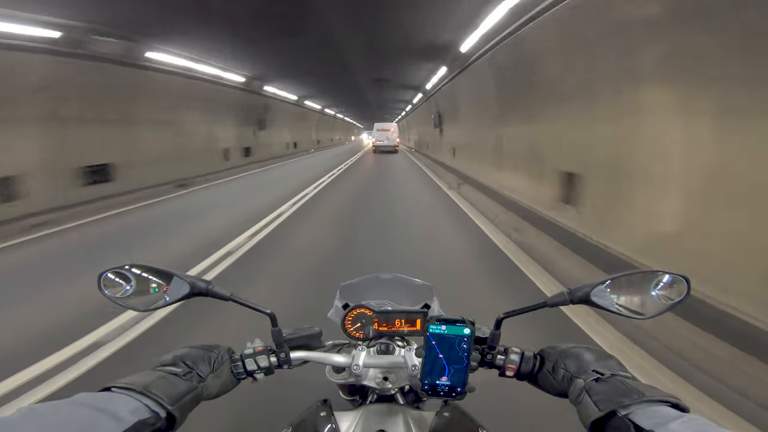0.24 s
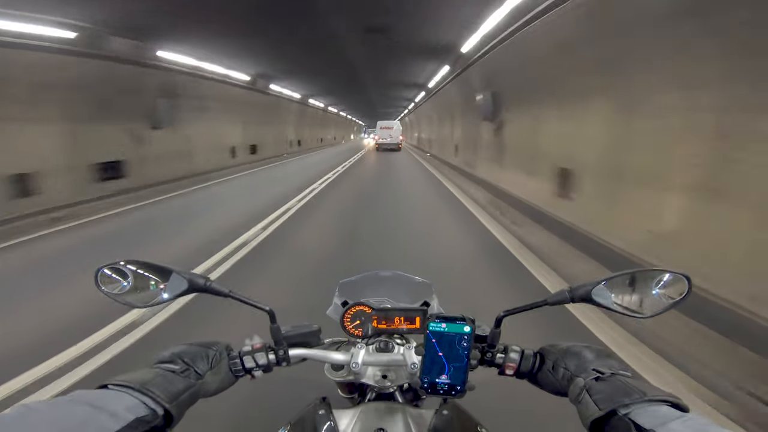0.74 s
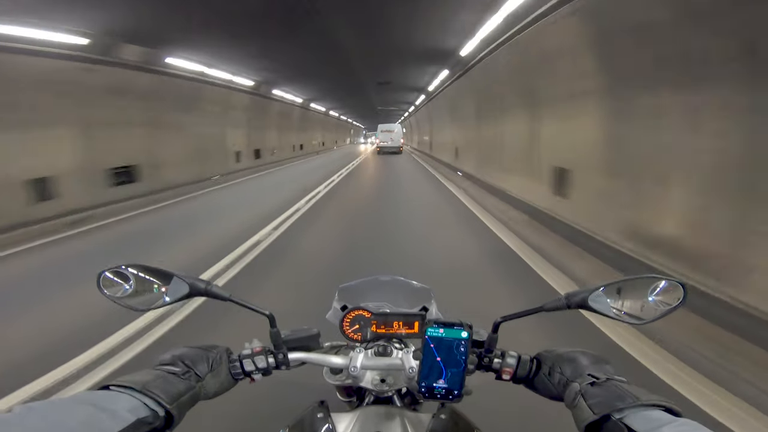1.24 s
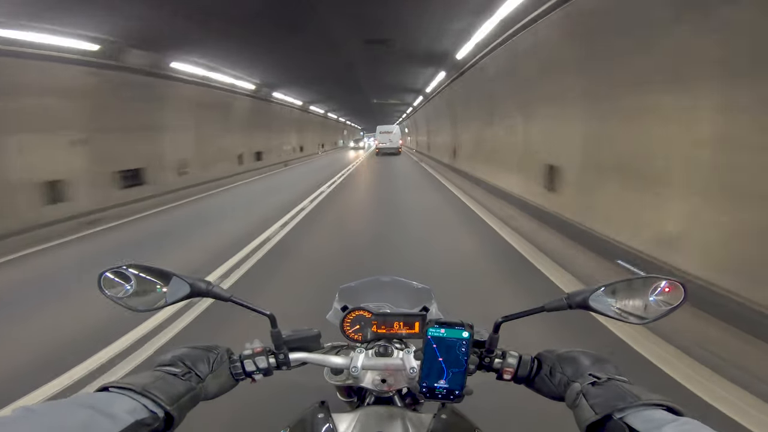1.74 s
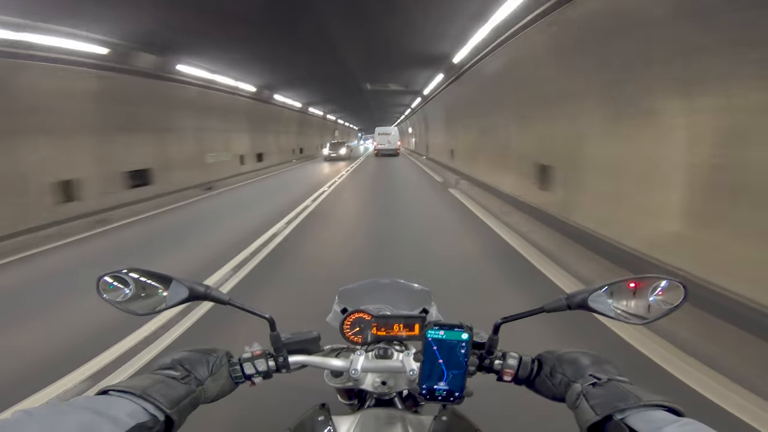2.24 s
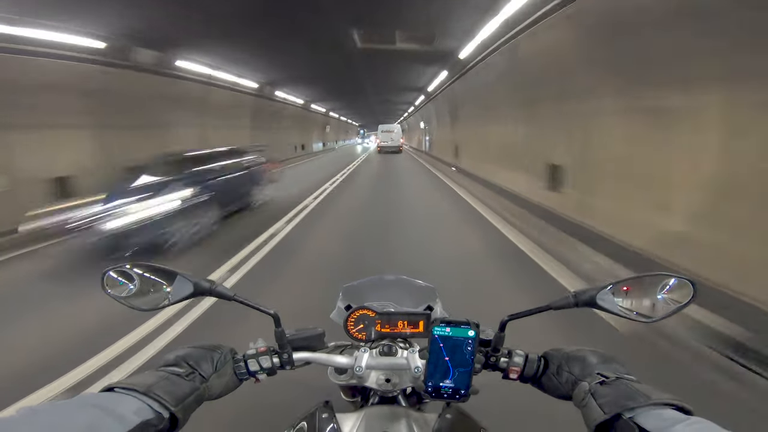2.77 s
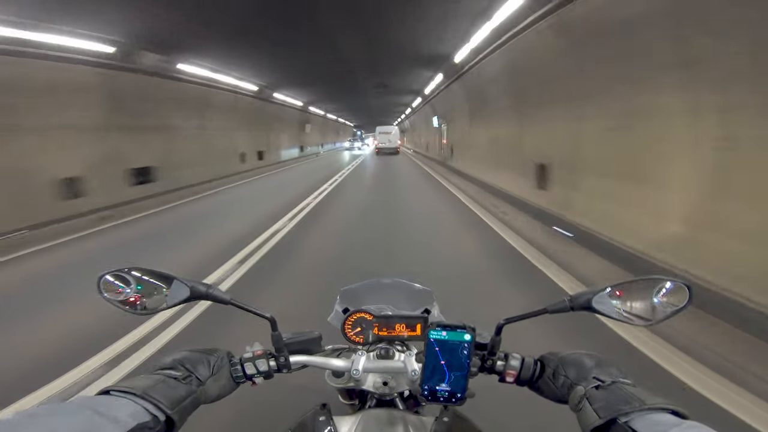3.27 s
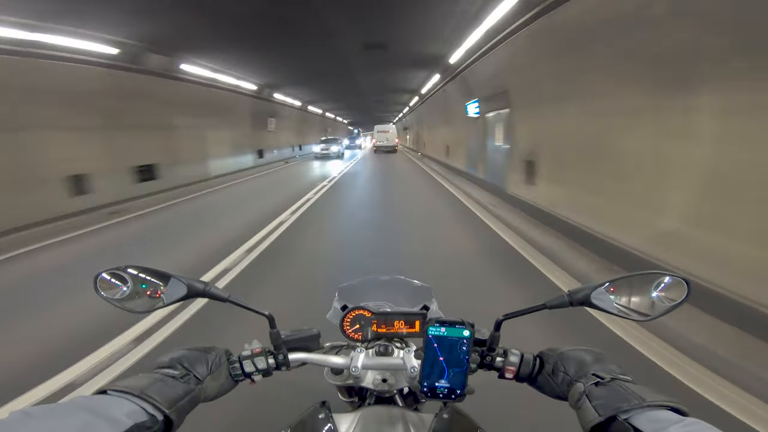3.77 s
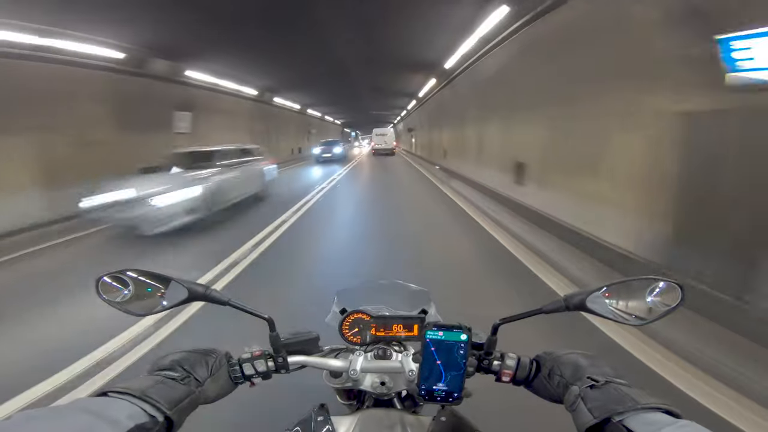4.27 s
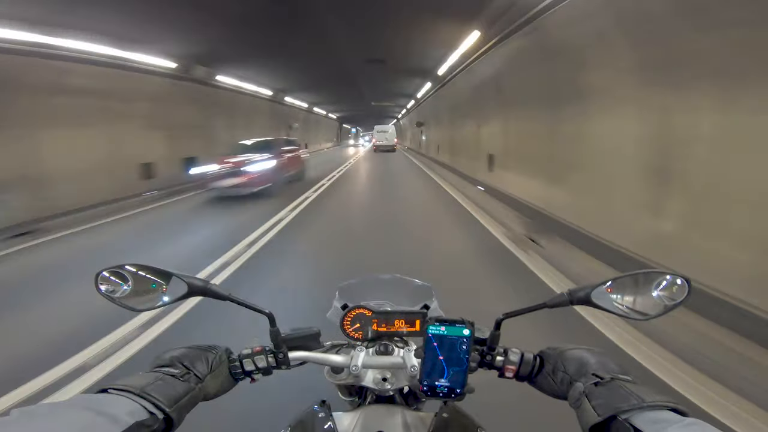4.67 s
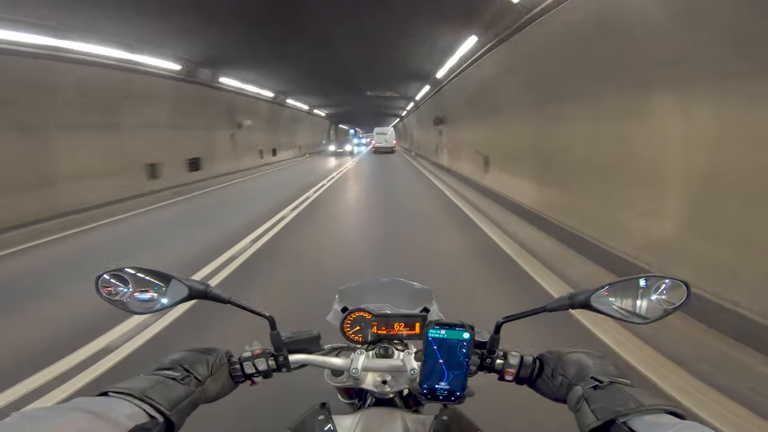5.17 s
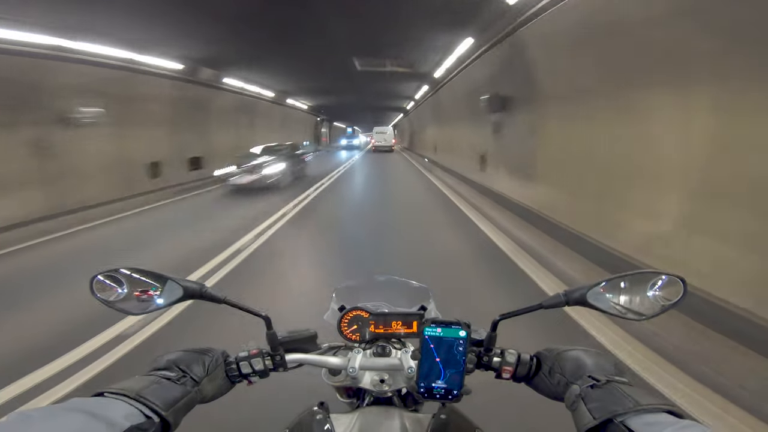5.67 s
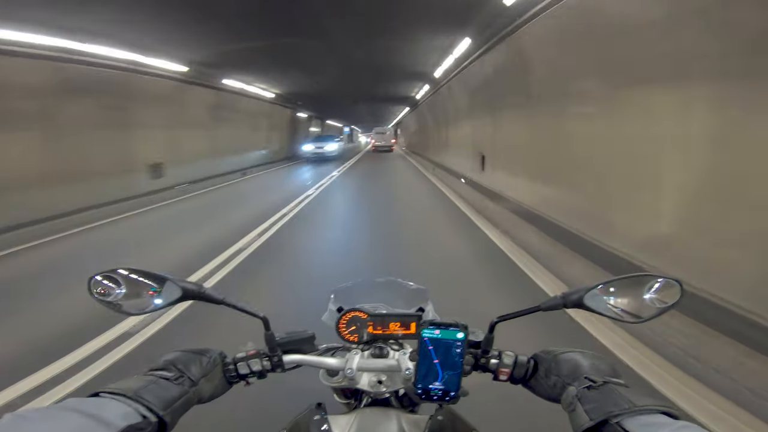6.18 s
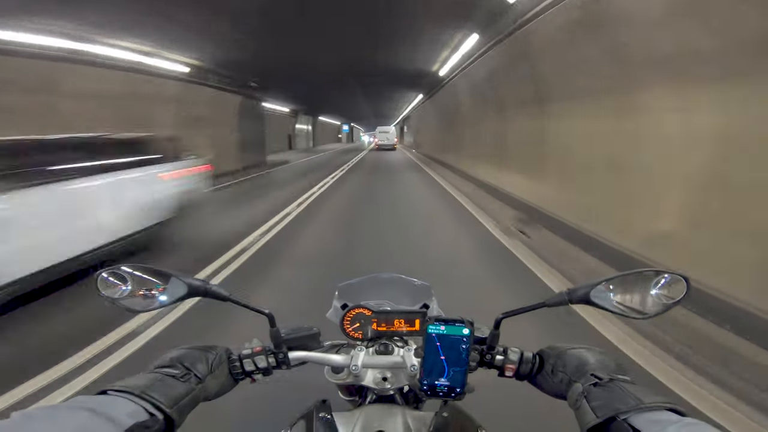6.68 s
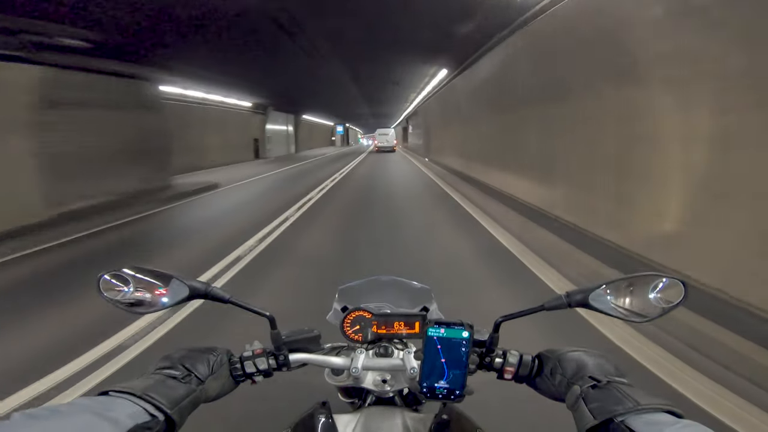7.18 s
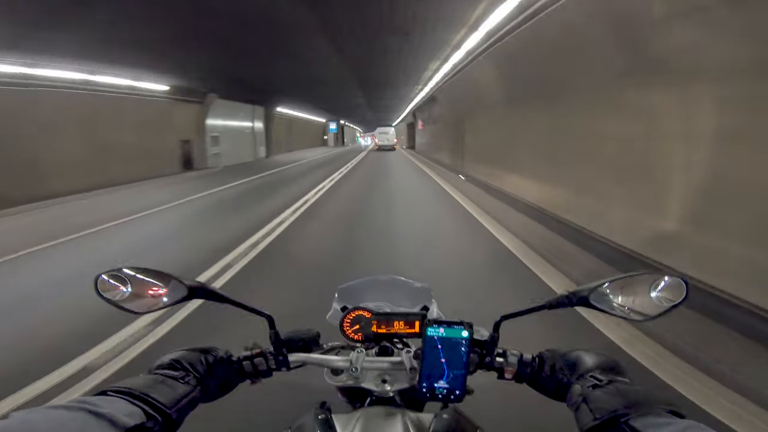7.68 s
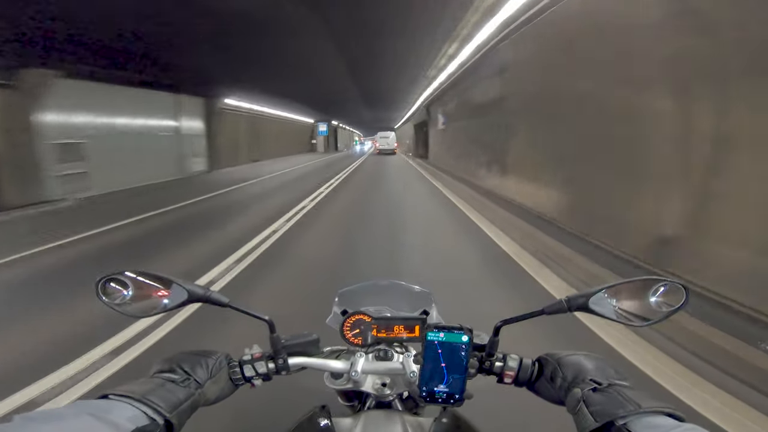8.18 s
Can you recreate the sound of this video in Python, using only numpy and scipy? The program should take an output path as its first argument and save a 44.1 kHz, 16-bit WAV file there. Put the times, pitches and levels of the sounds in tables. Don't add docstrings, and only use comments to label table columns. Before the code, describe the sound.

A twin-cylinder motorcycle hums steadily through a road tunnel, then gradually climbs in pitch amid tyre roar, oncoming cars and muffled wind thumps.

```python
import sys
import numpy as np
from scipy import signal
from scipy.fft import rfft, irfft, next_fast_len
from scipy.io import wavfile
from scipy.ndimage import uniform_filter1d, map_coordinates

SR = 44100
rng = np.random.default_rng(int(sys.argv[2]) if len(sys.argv) > 2 else 0)


def boost_factor(decibels):
    exponent = np.asarray(decibels, float) / 20
    return 10 ** exponent


def waveform_to_disk(signal):
    frames = np.transpose(np.atleast_2d(signal))
    scaled = np.clip(frames, -1, 1) * 32767
    samples = np.round(scaled).astype(np.int16)
    wavfile.write(sys.argv[1], SR, samples)


N = 371322
LEFT_RIGHT = np.array([[1], [-1]])


def unit(x):
    return x / np.sqrt(np.mean(x ** 2) + 1e-20)


def along(points, hz):
    f, v = np.transpose(points)
    return np.interp(np.log(hz + 1), np.log(f + 1), v)


def curves(rows):
    s, *cols = np.transpose(rows)
    return [np.interp(np.arange(N) / SR, s, c) for c in cols]


def wobble(rate):
    knots = rng.standard_normal(int(N * rate / SR) + 4)
    return map_coordinates(knots, [np.arange(N) * rate / SR])


def swell(s, half_s):
    return np.exp(-((np.arange(N) / SR - s) / (half_s + 0.014)) ** 2)


def filtered(x, response):
    margin = 4096
    edge = [(0, 0)] * (x.ndim - 1) + [(margin, margin)]
    m = next_fast_len(N + 3 * margin)
    wide = np.pad(x, edge, mode="reflect", reflect_type="odd")
    out = irfft(rfft(wide, m) * response(np.fft.rfftfreq(m, 1 / SR)), m)
    return out[..., margin:margin + N]


def evened(x, share):
    envelope = np.abs(signal.hilbert(x.mean(axis=0), next_fast_len(N))[:N])
    return unit(x / (uniform_filter1d(envelope, size=1500) + .05) ** share)


# f/Hz, correlation
LIKENESS = [(60, 1), (110, 0.89), (190, 0.76), (330, 0.82), (580, 0.92), (850, 0.85), (1080, 0.65),
            (1320, 0.8), (1820, .62), (3210, 0.73), (5000, .68), (7000, 0.99)]
# f/Hz, left-right level/dB
BALANCE = [(20, 1.4), (100, 1.2), (150, .5), (230, -.5), (350, -2.5), (550, -2), (850, -1.5), (1330, -.5),
           (2060, -1.6), (3210, -1), (5000, -1), (7000, 0)]
# f/Hz, left lead/rad
LEFT_LEAD = [(20, -.1), (200, -.2), (430, -.5), (1210, .2), (1460, -.6), (1720, 0), (1980, -.5),
             (2240, -.3), (2500, .4), (2840, -.9), (3360, -.9), (7000, 0)]


def rush(spectrum, gate=1, patchy_db=0):
    z = signal.stft(gate * rng.standard_normal((2, N)), nperseg=1024)[2]
    patches = uniform_filter1d(rng.standard_normal(z.shape[1:]), size=5, axis=0)
    patches = unit(uniform_filter1d(patches, size=8, axis=1))
    pair = signal.istft(z * boost_factor(patchy_db * patches), nperseg=1024)[1][:, :N]

    def spread(hz):
        angle = np.arccos(np.clip(along(LIKENESS, hz), 0, 1)) / 2
        return boost_factor(along(spectrum, hz)) * [np.cos(angle), np.sin(angle)]

    def aim(hz):
        gain = boost_factor(LEFT_RIGHT * along(BALANCE, hz) / 2)
        return gain * np.exp(.5j * LEFT_RIGHT * along(LEFT_LEAD, hz))

    mid, side = filtered(pair, spread)
    return unit(filtered(mid + LEFT_RIGHT * side, aim))


# t/s, crank f/Hz
CRANK_SPEED = [(0.0, 41.9), (0.6, 41.88), (1.5, 41.68), (2.6, 41.61), (3.2, 41.48), (3.9, 41.54),
               (4.8, 41.86), (5.4, 42.4), (6.2, 43.33), (7.0, 44.39), (7.6, 45.25), (8.42, 46.31)]


def crank():
    crank_hz, = curves(CRANK_SPEED)
    return crank_hz, np.cumsum(crank_hz) / SR


SPEED_STAGES = [41.8, 43.2, 44.3, 45.8]


def at_speed(crank_hz, levels):
    return np.interp(crank_hz, SPEED_STAGES, levels)


# crank order, level/dB at each of the four speeds
EXHAUST_ORDERS = [(0.5, -60, -60, -62, -64), (1, -42.5, -42, -37, -39), (1.5, -61, -55, -52, -53),
                  (2, -35, -34, -32, -33), (3, -39.5, -36, -33.5, -34), (3.5, -53, -58, -56, -43),
                  (4, -40, -45, -47, -44), (4.5, -50, -54, -56, -65), (5, -54, -49, -43, -42),
                  (5.5, -52, -44, -41, -42), (6, -40.5, -36, -33, -37.5), (6.5, -46, -49, -66, -56),
                  (7, -45, -40, -37, -33), (7.5, -46, -43, -50, -46), (8, -42, -42, -34.5, -33.5),
                  (8.5, -53, -54, -49, -42), (9, -50, -38.5, -50, -54), (10, -43.5, -44.5, -46, -47)]
# level/dB at each of the four speeds, lead on the sum/rad
ORDER_SIDES = [(-80, -73, -82, -88, -0.2), (-77, -61, -80, -69, 1.3), (-76, -62, -64, -63, -0.3),
               (-56, -55, -53, -61, -0.8), (-57, -57, -79, -77, -1.4), (-80, -79, -60, -54, -2.0),
               (-57, -56, -53, -53, -0.6), (-56, -56, -55, -52, -1.5), (-74, -54, -51, -62, 1.5),
               (-54, -54, -51, -54, 3.1), (-54, -55, -52, -59, -1.6), (-54, -57, -60, -57, -1.4),
               (-55, -46, -43, -44, -2.8), (-51, -48, -48, -46, -2.3), (-49, -40, -38, -36, -2.0),
               (-59, -60, -56, -50, -2.4), (-55, -49, -55, -53, -2.6), (-55, -52, -64, -57, -1.9)]


def exhaust(crank_hz, turns):
    out = np.zeros((2, N))
    for (order, *levels), (*side_levels, ahead) in zip(EXHAUST_ORDERS, ORDER_SIDES):
        flicker_db = order * (.08 + .13 * wobble(7)) + .5 * wobble(4) * (order < 4)
        timing = .25 + (.02 + 2 * (order % 1)) * rng.random()
        silencer_lag = .43 * order ** 2
        angle = 2 * np.pi * (order * turns + timing) - silencer_lag + .025 * order * wobble(3)
        mid = boost_factor(at_speed(crank_hz, levels)) * np.sin(angle)
        side = boost_factor(at_speed(crank_hz, side_levels)) * np.sin(angle + ahead)
        out += np.sqrt(2) * boost_factor(flicker_db) * (mid + LEFT_RIGHT * side)
    return out


# f/Hz, level/dB
RASP_SPECTRUM = [(90, -45), (150, -11.5), (200, -8.5), (228, -7.5), (240, -4.5), (262, -4), (310, -6.5),
                 (390, -5), (440, -8), (520, -17), (800, -60), (3000, -140)]


def rasp(crank_hz, turns):
    level_db = -32.5 - 0.2 * (crank_hz - SPEED_STAGES[0]) + 0.1 * wobble(8.3)
    puff = 1 + .25 * np.cos(2 * np.pi * turns)
    return boost_factor(level_db) * evened(rush(RASP_SPECTRUM, puff, patchy_db=.4), share=.5)


# f/Hz, level/dB
HEAD_METAL = [(1500, -17.5), (3000, -0.5), (4200, -8.5), (5000, -11.5), (6000, -14), (7000, -18.5),
              (8500, -22.5), (10300, -31), (11400, -29), (12500, -27.5), (13500, -36), (15000, -51)]
# share of the two-turn cycle, knock level/dB, tick level/dB
SEATINGS = [
    (.06, -2.5, -5),
    (.34, -4, 1.5),
    (.66, -0.5, -2),
    (.87, -10.5, -7.5),
]


def valves(crank_hz, turns):
    knock, tick = .8, .9
    for share, knock_db, tick_db in SEATINGS:
        since = (turns / 2 - share + .012 * wobble(18)) % 1
        knock = knock + boost_factor(knock_db + 2.7 * wobble(30) - 60 * since / 0.55)
        tick = tick + boost_factor(tick_db + 2 * wobble(30) - 60 * since / .5)
    knock = uniform_filter1d(knock, size=90)
    tick = np.roll(uniform_filter1d(tick, size=90), 60)

    def treble(hz):
        return 1 / (1 + (6000 / (hz + 1)) ** 6)

    low = filtered(rush(HEAD_METAL, knock), lambda hz: np.sqrt(1 - treble(hz)))
    high = filtered(rush(HEAD_METAL, tick), lambda hz: np.sqrt(treble(hz)))
    level_db = -64 + .4 * (crank_hz - SPEED_STAGES[0]) + .4 * wobble(6)
    return boost_factor(level_db) * (low + high)


SHAFT_HUM = [(-49, -50, -50, -50), (-50, -38.5, -39, -36.5), (-56, -50, -55, -56)]
RATTLE_LEVELS = [-62, -54, -57, -50.5]
# f/Hz, level/dB
CASING_RING = [(400, -30.5), (600, -3), (1000, 1.5), (1400, -0.5), (1900, -4.5), (2600, -15), (3500, -29),
               (6000, -62.5), (15000, -120)]


def driveline(crank_hz, turns):
    shaft_turns = 3.065 * turns
    hum = 0
    for k, levels in enumerate(SHAFT_HUM, start=1):
        hum = hum + boost_factor(at_speed(crank_hz, levels) + wobble(1.8)) * np.sin(2 * np.pi * k * shaft_turns)
    pattern = rng.standard_normal((3, 2, 512))
    pattern = pattern[:, :1] + .5 * pattern
    pattern = (pattern[0] + 0.58 * pattern[1:]).reshape(2, -1)
    teeth = pattern[:, (turns * 512).astype(int) % 1024]
    rattle = unit(filtered(teeth, lambda hz: boost_factor(along(CASING_RING, hz))))
    hum = np.sqrt(2) * hum * boost_factor(.8 * LEFT_RIGHT)
    return hum + boost_factor(at_speed(crank_hz, RATTLE_LEVELS)) * rattle


# crank order, level/dB at each of the four speeds
GEAR_WHINES = [(62.9, -66, -78, -82, -82), (59.8, -66, -74, -82, -82), (45.8, -63, -60, -66, -70),
               (41, -72, -59, -57, -57), (32.5, -66, -58, -56, -54)]


def gears(crank_hz, turns):
    out = 0
    for order, *levels in GEAR_WHINES:
        backlash = 1.3 * np.array([wobble(60), wobble(60)])
        level_db = at_speed(crank_hz, levels) + 2.2 * wobble(12)
        out = out + np.sqrt(2) * boost_factor(level_db) * np.sin(2 * np.pi * order * turns + backlash)
    return out


# t/s, tyre roar level/dB
TUBE_ROAR = [(0.0, -34.5), (2.1, -34), (3.2, -33), (4.2, -34), (6.0, -31.5), (6.6, -31.5), (7.9, -32.5),
             (8.42, -34)]
# t/s, swell level/dB
ONCOMING = [
    (2.6, 0),
    (3.9, 1),
    (4.6, 0.5),
    (5.7, 0),
    (6.5, 0.1),
]


def traffic():
    roar_db, = curves(TUBE_ROAR)
    roar_db = roar_db + sum(db * swell(s, .25) for s, db in ONCOMING)
    hiss_db = -45 + 0.67 * (roar_db - TUBE_ROAR[0][1])
    return roar_db, hiss_db


# f/Hz, level/dB
ROAR_SPECTRUM = [(250, -20.5), (400, -4), (500, -1), (620, 0.5), (700, -4), (850, -1), (1100, -6),
                 (1300, -12), (1600, -30), (2500, -60.5), (6000, -140)]
# f/Hz, level/dB
HISS_SPECTRUM = [(700, -47.5), (1200, -4), (1500, -1.5), (1700, -5), (2000, -8), (2400, -13.5),
                 (2900, -17.5), (3100, -25), (3800, -27), (4500, -34), (7000, -58), (14000, -91)]


def tunnel(turns):
    roar_db, hiss_db = traffic()
    throb = 1 + 0.087 * np.cos(2 * np.pi * turns) + 0.055 * np.cos(np.pi * turns)
    roar = boost_factor(roar_db + 0.12 * wobble(8.2)) * rush(ROAR_SPECTRUM, throb, patchy_db=-0.98)
    hiss = boost_factor(hiss_db + 0.3 * wobble(6.5)) * rush(HISS_SPECTRUM, throb, patchy_db=0.54)
    return roar + hiss


# f/Hz, level/dB
BUFFET_SPECTRUM = [(8, -37.5), (16, -11), (24, -4), (33, -1), (44, -5), (62, -12.5), (95, -41), (300, -140)]
# f/Hz, level/dB
FLUTTER_SPECTRUM = [(25, -41), (45, -3.5), (65, -3), (100, -6.5), (150, -12), (220, -25.5), (400, -58),
                    (1500, -140)]
# t/s, level/dB, half length/s
WAKE_GUSTS = [(0.203, -35, 0.14), (0.694, -43, 0.12), (.9, -41, .06), (1.15, -41, 0.058), (1.45, -41, 0.06),
              (1.956, -30.5, 0.16), (2.22, -41, 0.055), (2.93, -30.5, .08), (3.08, -29.5, 0.075),
              (3.47, -30.5, 0.12), (4.12, -37, 0.046), (4.26, -31, 0.065), (4.5, -41, 0.043),
              (4.576, -40, .06), (5.09, -41.5, 0.098), (5.3, -44, 0.089), (5.57, -41, 0.063),
              (5.8, -43.5, 0.039), (6.17, -25, 0.063), (6.338, -37, 0.055), (6.45, -41, .06),
              (6.708, -40, 0.081), (6.943, -35, 0.079), (7.12, -35, 0.087), (7.65, -32.5, 0.094),
              (8.026, -41, 0.069), (8.2, -40, 0.072), (8.41, -34, 0.055)]


def wind():
    gust = sum(boost_factor(db) * swell(s, half_s) for s, db, half_s in WAKE_GUSTS)
    eddies = boost_factor(-39) * (gust / boost_factor(-35)) ** 0.5
    eddies = uniform_filter1d(eddies, size=4000) + boost_factor(-43)
    buffet = evened(rush(BUFFET_SPECTRUM), share=.8)
    flutter = evened(rush(FLUTTER_SPECTRUM, patchy_db=3.5), share=0.99)
    thump = (boost_factor(-2.0) * gust + boost_factor(-47.5)) * buffet
    return thump + eddies * boost_factor(1.5 * wobble(6)) * flutter


# f/Hz, width/Hz, left level/dB, right level/dB
SHELL_MODES = [(1560, 90, 5, 2), (2000, 140, 1, 2), (2620, 100, 3, 3.5), (2880, 120, 3, 3),
               (3440, 110, 2, 6), (3770, 160, 6, 6), (5060, 120, 8, 8), (5330, 150, -3, -3),
               (5540, 110, 2, 4), (6065, 110, 6, 5), (6430, 110, 3, 4)]
# f/Hz, width/Hz, left level/dB, right level/dB
BODY_ECHOES = [(403, 14, -3, -3), (448, 14, -3, -3), (1625, 45, -4, -4), (2470, 140, -2, -2),
               (2985, 90, -3, -3), (3470, 120, 1.5, 1.5), (3800, 120, -1.5, -1.5), (990, 60, -1, -1),
               (1050, 50, 0, 1.5), (1190, 60, 2, 1.5), (1290, 90, -2, -2), (1440, 60, -2, 0),
               (1490, 120, 0, 1.8), (1670, 90, -2.5, -1.5), (1760, 50, 1.5, 1.5), (1900, 60, .6, 2.2),
               (1960, 50, -1.5, -1), (2150, 50, 1.5, -1), (2300, 250, -3, 1.5), (2410, 60, -2.5, 1),
               (2500, 80, 2.2, 0), (2710, 70, 0, -3), (3080, 150, -1, -2), (3220, 120, 2.2, 1),
               (3630, 80, -6, -4), (3900, 250, -2.2, 1.5), (4040, 60, -1, -3.5), (4650, 150, -2, -2),
               (4900, 100, -4, -1), (5700, 200, -5, 2), (6220, 130, -2.5, -2.5)]
# f/Hz, width/Hz, level/dB
PORT_MESH = [(6880, 120, 2), (7190, 140, 5), (8300, 200, 3), (8570, 100, -2), (8750, 120, 3),
             (9130, 100, -2.5), (9530, 300, 6), (10700, 150, 5), (10830, 70, -6), (10960, 70, 9),
             (12000, 500, 4), (12740, 90, -3), (13000, 200, 6), (13220, 70, -4), (13340, 150, 7),
             (13570, 70, -5), (13680, 100, 3), (13900, 300, -2)]


def housing(hz):
    def bell(centre, width):
        return 1 / (1 + (2 * (hz - centre) / width) ** 2)

    gain_db = sum(db * bell(f, width) for f, width, db in PORT_MESH)
    for f, width, left_db, right_db in SHELL_MODES + BODY_ECHOES:
        gain_db = gain_db + np.array([[left_db], [right_db]]) * bell(f, width)
    return boost_factor(gain_db)


def scene():
    crank_hz, turns = crank()
    engine = exhaust(crank_hz, turns) + rasp(crank_hz, turns) + valves(crank_hz, turns)
    engine = engine + driveline(crank_hz, turns) + gears(crank_hz, turns)
    return engine + tunnel(turns) + wind()


def top_cut(x):
    return signal.sosfilt(signal.butter(12, 13780, fs=SR, output="sos"), x)


def record(dry):
    opening = np.minimum(np.arange(N) / (.001 * SR), 1)
    return top_cut(opening * filtered(dry, housing))


dry = scene()
out = record(dry)
waveform_to_disk(out)
```